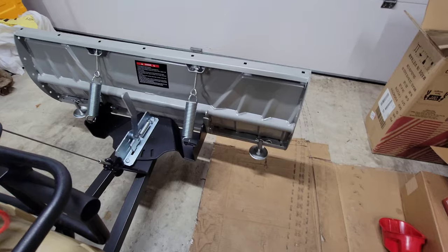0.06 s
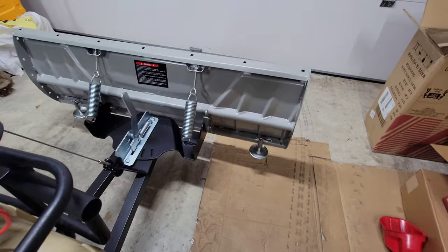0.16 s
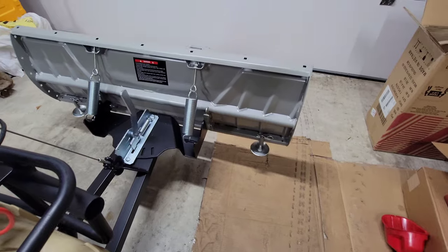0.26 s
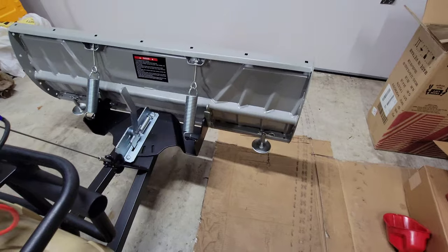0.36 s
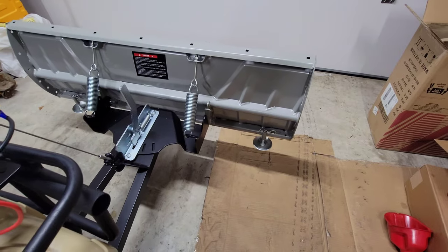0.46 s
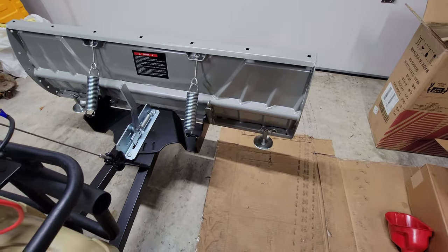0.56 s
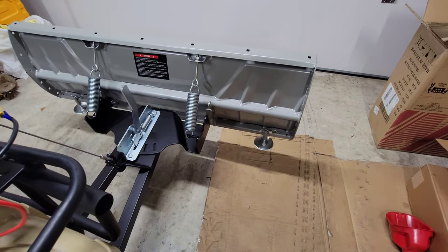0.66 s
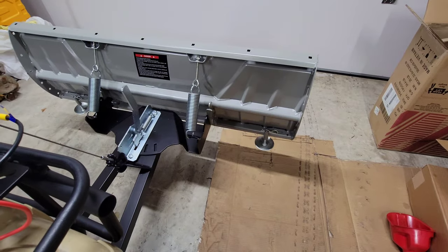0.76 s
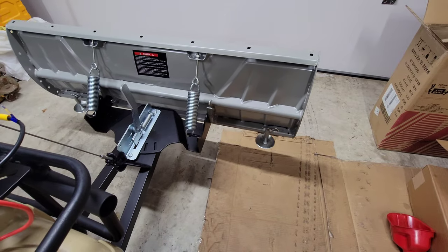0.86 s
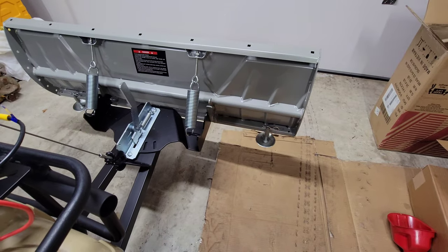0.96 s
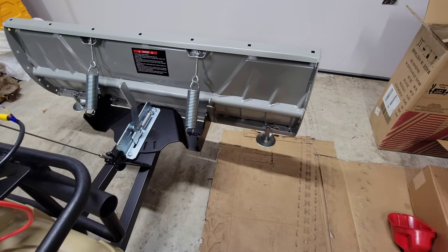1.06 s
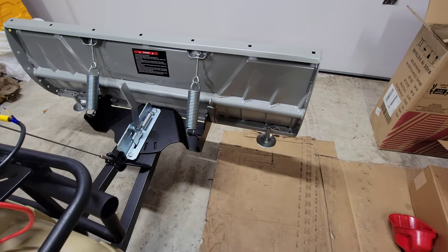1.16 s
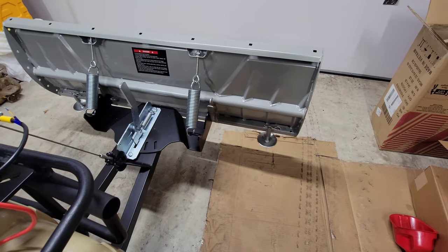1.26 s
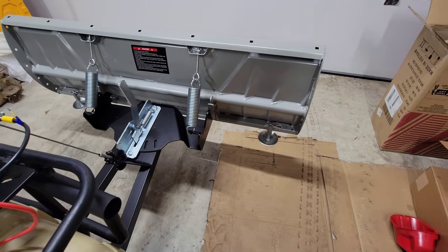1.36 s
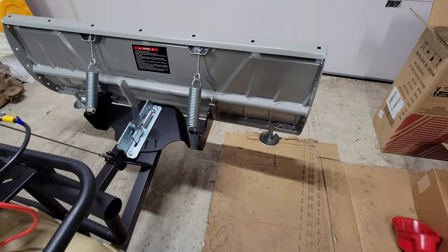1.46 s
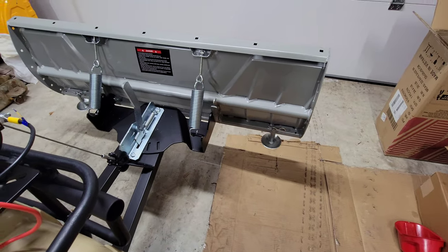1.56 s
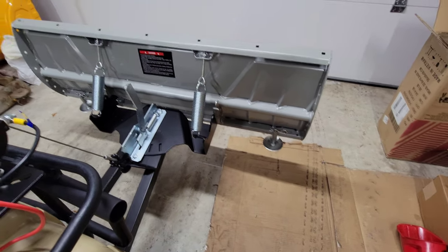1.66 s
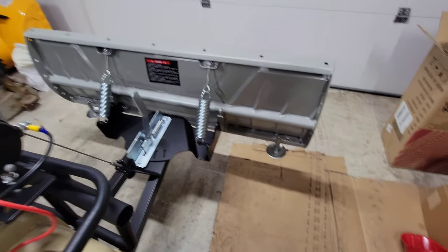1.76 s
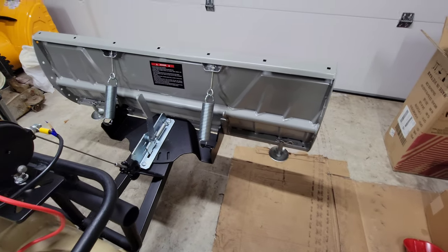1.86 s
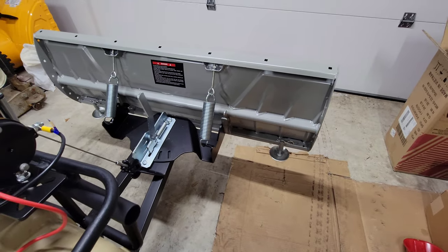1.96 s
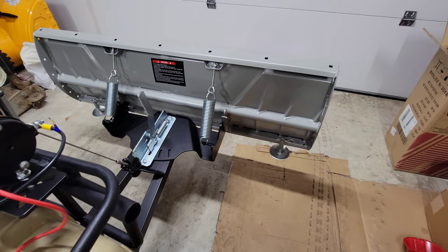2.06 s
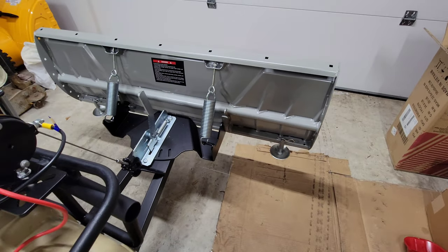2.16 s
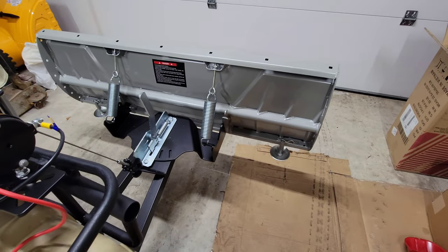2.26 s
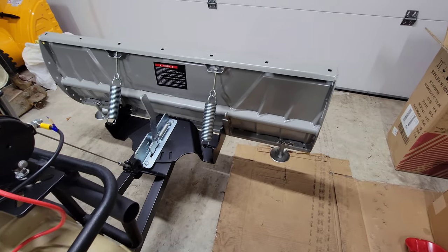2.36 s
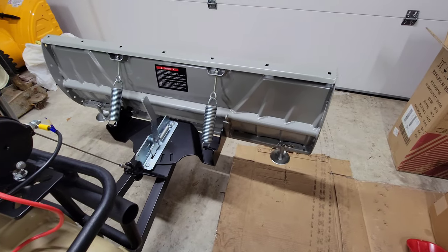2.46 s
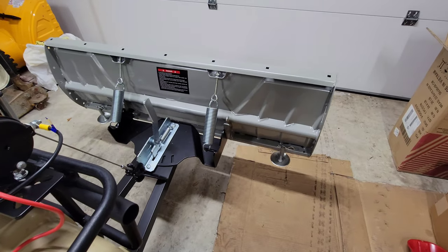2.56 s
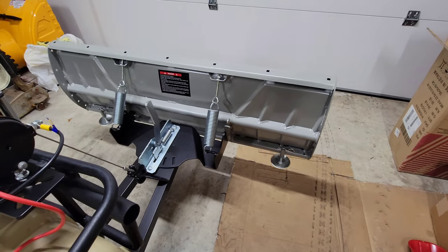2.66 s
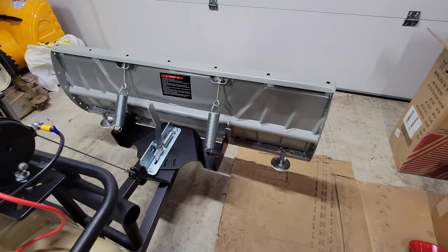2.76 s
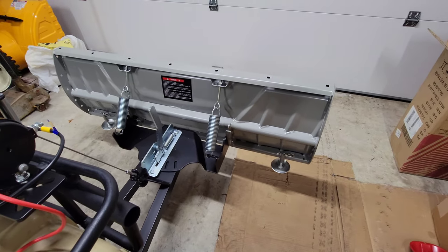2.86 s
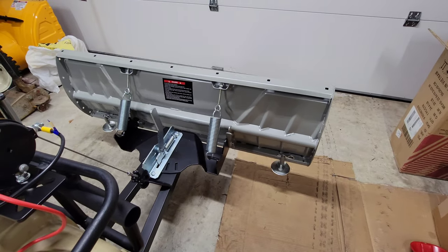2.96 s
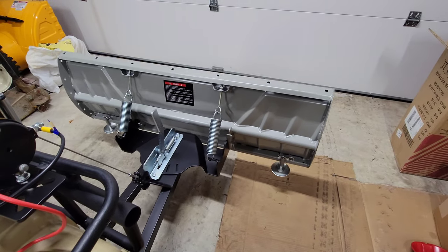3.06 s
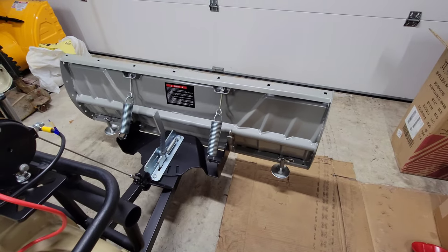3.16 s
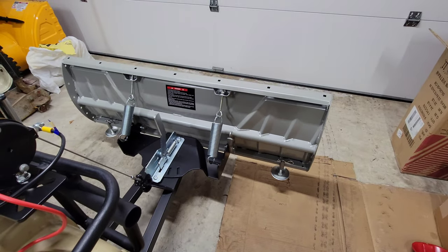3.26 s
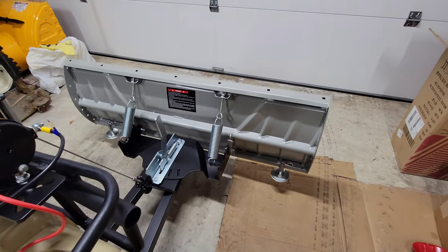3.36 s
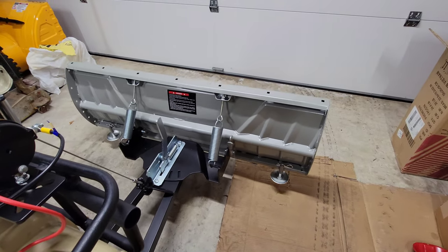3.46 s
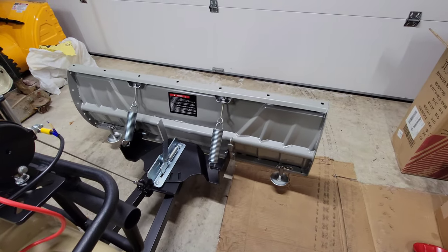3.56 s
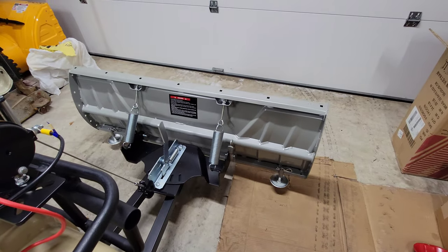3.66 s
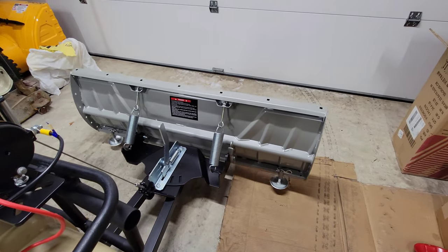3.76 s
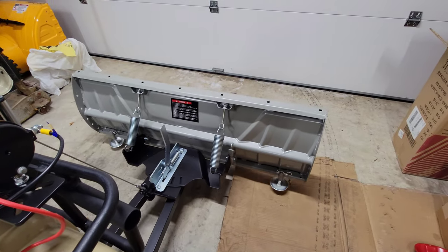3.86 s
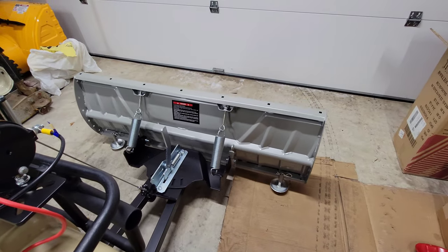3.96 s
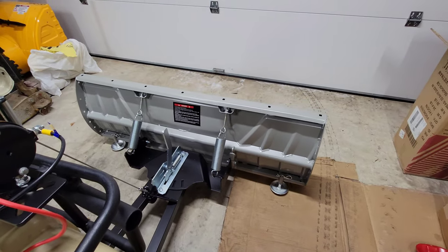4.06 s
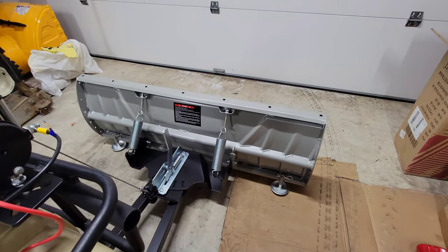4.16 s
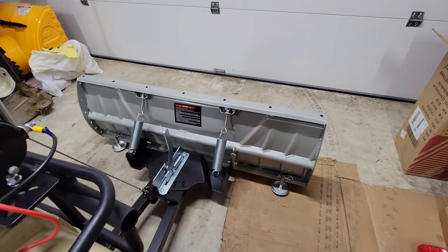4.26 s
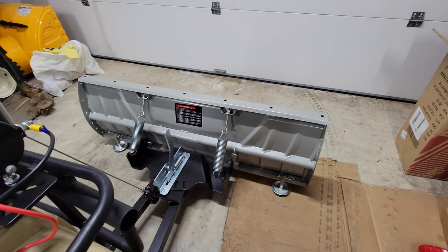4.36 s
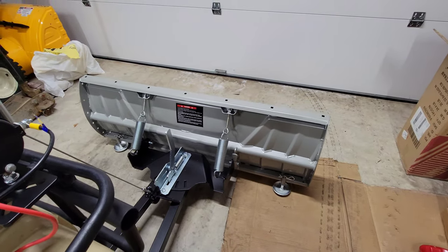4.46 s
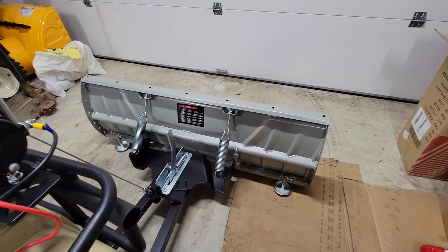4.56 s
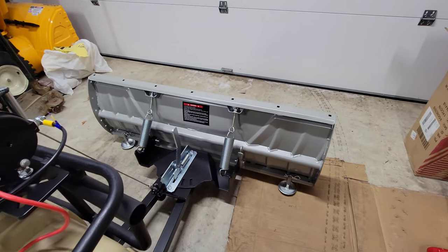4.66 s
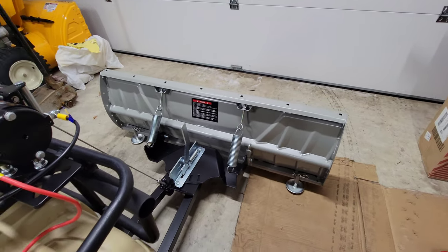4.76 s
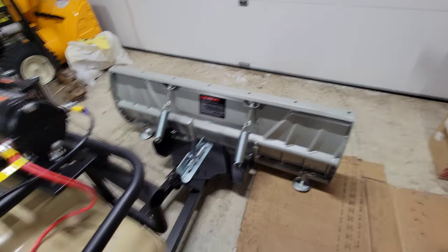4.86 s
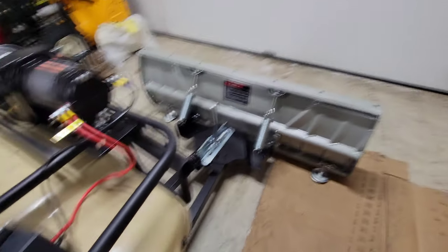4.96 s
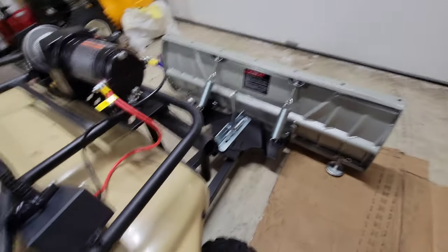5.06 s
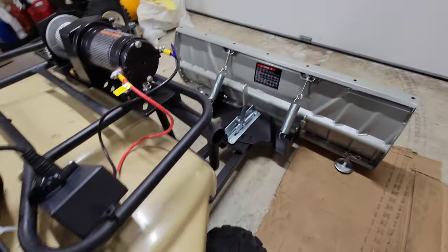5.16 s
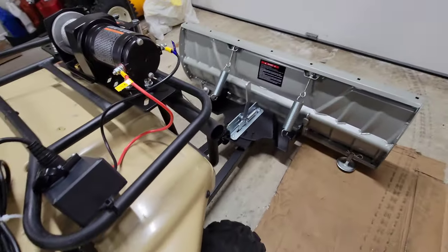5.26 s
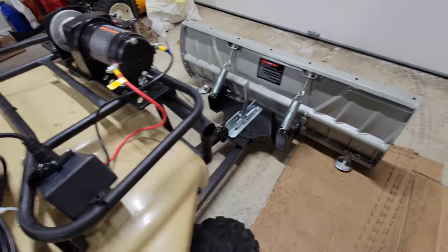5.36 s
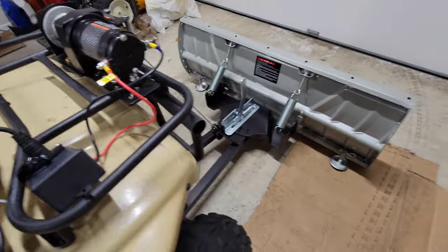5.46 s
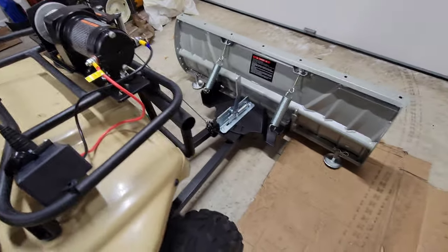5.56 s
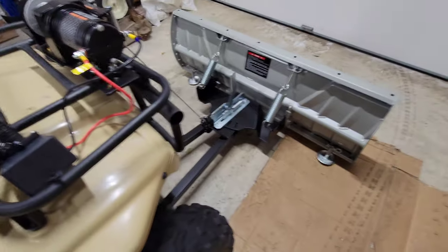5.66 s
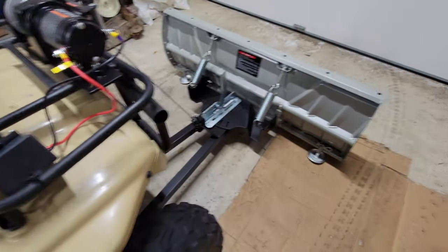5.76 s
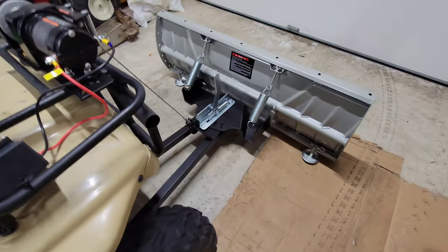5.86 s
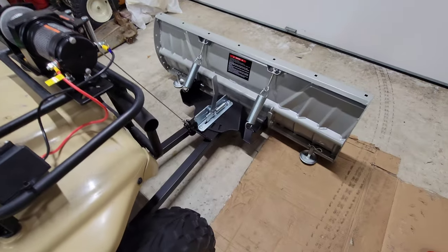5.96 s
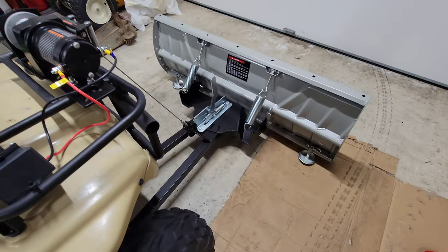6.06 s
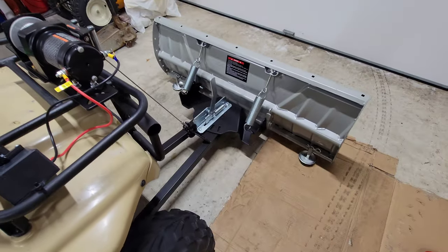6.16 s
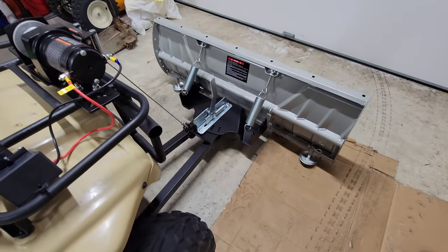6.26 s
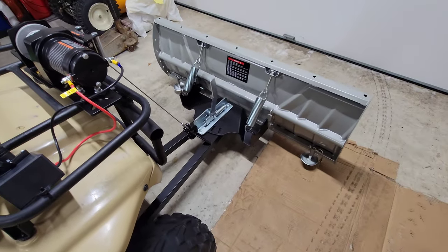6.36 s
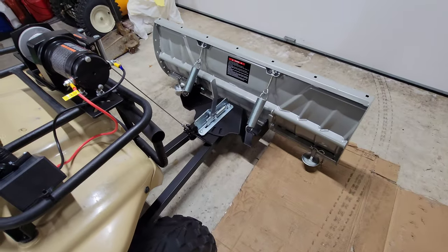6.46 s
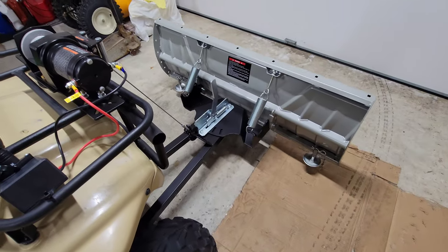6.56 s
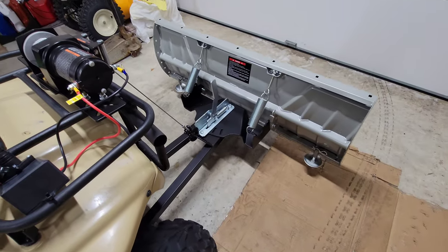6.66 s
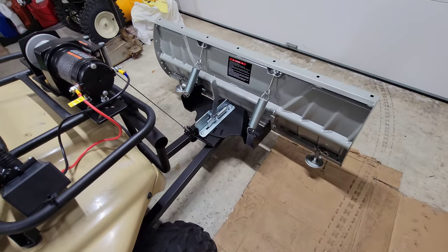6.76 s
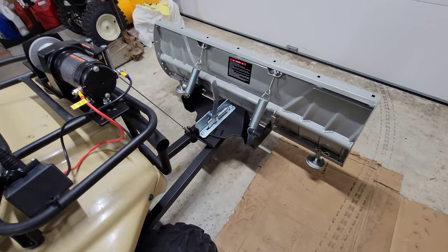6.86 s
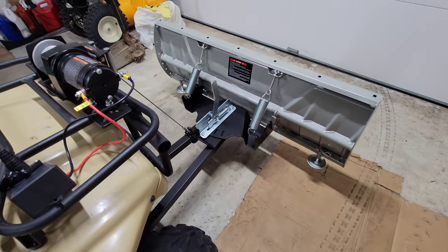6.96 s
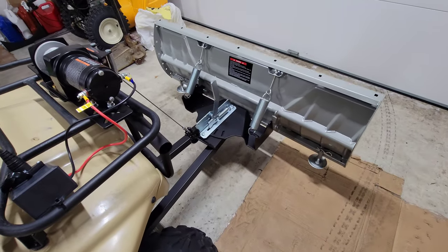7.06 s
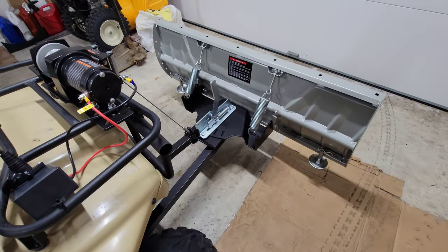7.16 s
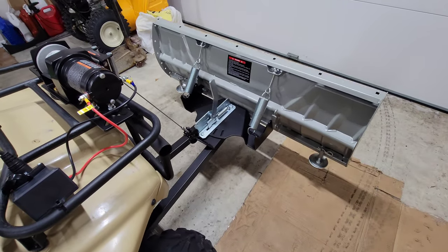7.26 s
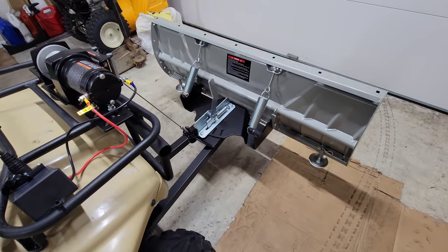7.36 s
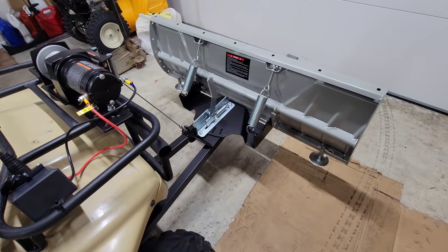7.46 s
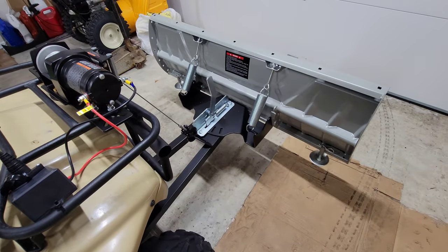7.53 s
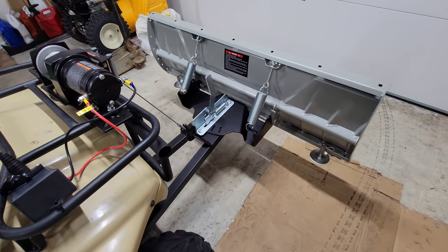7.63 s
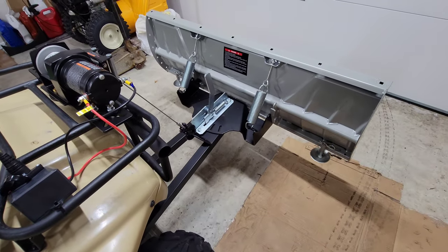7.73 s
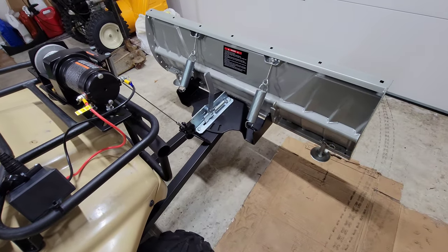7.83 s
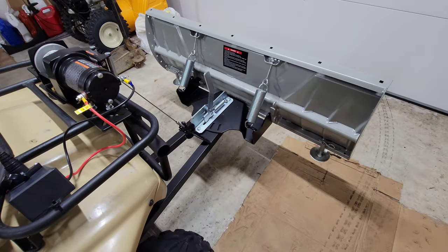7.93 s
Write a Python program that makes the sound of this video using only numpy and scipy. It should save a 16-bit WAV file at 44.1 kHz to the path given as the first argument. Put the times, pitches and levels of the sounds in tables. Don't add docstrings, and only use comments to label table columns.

```python
import sys
import numpy as np
from scipy import signal
from scipy.fft import rfft, irfft, next_fast_len
from scipy.io import wavfile
from scipy.ndimage import uniform_filter1d

SR = 44100
rng = np.random.default_rng(int(sys.argv[2]) if len(sys.argv) > 2 else 0)


def rack_gain(trim_db):
    fader = np.asarray(trim_db, float)
    return 10 ** (fader / 20)


def pcm_store(signal):
    levels = np.round(np.clip(np.atleast_2d(signal), -1, 1) * 32767)
    wavfile.write(sys.argv[1], SR, levels.astype(np.int16).T)


N = 352468
TEETH_PER_TURN = 16


def unit(x):
    return x / np.sqrt(np.mean(x ** 2) + 1e-20)


def along(points, hz):
    f, v = np.transpose(points)
    return np.interp(np.log(hz + 1), np.log(f + 1), v)


def filtered(x, response):
    size = x.shape[-1]
    m = next_fast_len(size + 8192)
    return irfft(rfft(x, m) * response(np.fft.rfftfreq(m, 1 / SR)), m)[..., :size]


def resonances(modes):
    def response(f):
        total = 0
        for k, (centre, width, db) in enumerate(modes):
            damping = 1j * f * width
            total = total + (-1) ** k * rack_gain(db) * damping / (centre ** 2 - f ** 2 + damping)
        return total
    return response


def noise(spectrum, size):
    return unit(filtered(rng.standard_normal(size), lambda hz: rack_gain(along(spectrum, hz))))


def wobble(rate, size):
    knots = rng.standard_normal(size // 16 + 4)
    return np.interp(np.arange(size) * min(rate, SR / 16) / SR, np.arange(len(knots)), knots)


def ports(x, lag, pan_db):
    # frequency in Hz, left minus right in dB.
    shade = [(60, -0.5), (110, 1.5), (200, -0.5), (380, 1), (700, 2), (1290, -2), (2380, -3), (4400, -10.5),
             (8120, 5.5), (15000, -6)]
    left = filtered(x, lambda hz: rack_gain(along(shade, hz) / 2 + pan_db / 2))
    right = filtered(np.roll(x, lag), lambda hz: rack_gain(-along(shade, hz) / 2 - pan_db / 2))
    return np.array([left, right])


def winch():
    # start in s, stop in s, steady tooth rate in Hz, effort in dB, rise in s.
    runs = [(0.21, 0.566, 342.4, -17.5, 0.028),
                                                                           (0.79, 1.055, 340.3, -18.5, 0.02),
                                                                           (1.257, 1.499, 339.7, -18, 0.034),
                                                                           (2.275, 4.157, 319.2, -20.5, 0.017),
                                                                           (4.161, 4.531, 319.8, -25.5, 0.048),
                                                                           (5.88, 7.845, 339, -20.5, 0.041)]
    # load (0 lifting, 1 lowering, 2 slack, 3 bump),
    # lag of the right port in samples, left minus right in dB.
    stance = [(3, 18, 1.5), (3, 18, 1.5), (3, 16, 1.5), (1, 26, 1), (2, 26, 1), (0, 14, .3)]
    hum_over_effort = [-16.5, -15, -13, -15.5, -13.5, -18.5]
    # Hz short of speed at the start, Hz of overspeed before the load bites,
    # effort at the start in dB, whine over grind in dB, brush hiss over effort in dB.
    loads = [
        (180.8, 42, -12.5, 2.5, -14.5),
        (105.74, 0, -13.5, 0.5, -20),
        (0, 0.5, 11, -4.5, -16.5),
        (138.5, 0, -13.5, 1, -14.5),
    ]
    # multiple of the tooth rate, level in dB.
    lift = [(1, 0), (2, -8.5), (3, -4.5), (4, -3.5), (5, -3.5), (6, -2.5), (7, -9), (8, -5.5), (9, -7),
            (10, -3), (11, -6), (12, -2.5), (13, -4.5), (14, -12), (15, -11.5), (16, -13), (17, -24),
            (18, -15), (19, -26), (20, -22)]
    # multiple of the tooth rate, level in dB.
    lower = [(1, 0.5), (2, -5.5), (3, 2.5), (4, -3), (5, -14.5), (6, -8.5), (7, -6), (8, -10), (9, -3.5),
             (10, -5), (11, -9), (12, -2.5), (13, -5.5), (14, -6), (15, -9.5), (16, -11.5), (17, -13),
             (18, -7), (19, -22), (20, -12.5)]
    # multiple of the tooth rate, level in dB.
    slack = [(1, 6), (2, -11), (3, -11), (4, -10), (5, -13), (6, -5.5), (7, -14.5), (8, -10), (9, -9),
             (10, -12), (11, -18), (12, -13), (13, -10.5), (14, -15), (15, -10), (16, -19), (17, -11.5),
             (18, -18.5), (19, -25.5), (20, -27.5)]
    # multiple of the tooth rate, level in dB.
    bump = [(1, -8.5), (2, -9.5), (3, -4.5), (4, -5.5), (5, -6), (6, -3.5), (7, -4), (8, -4.5), (9, -7),
            (10, -6.5), (11, -6.5), (12, -0.5), (13, -4), (14, -13.5), (15, -10.5), (16, -17), (17, -22),
            (18, -12.5), (19, -19), (20, -12)]
    can_ring = [-1, 1, -2, -0.5]
    drum_rasp = [-13, -11, -0.5, -11.5]
    out = np.zeros((2, N + SR))
    for run, (load, lag, pan_db), hum_db in zip(runs, stance, hum_over_effort):
        orders = [lift, lower, slack, bump][load]
        motor = motor_run(run, loads[load], orders, hum_db, can_ring[load], drum_rasp[load])
        sound = ports(np.pad(motor, 64), lag, pan_db)
        out[:, round(run[0] * SR) - 64:][:, :sound.shape[1]] += sound
    return out[:, :N]


def motor_run(run, load, orders, hum_db, can_db, rasp_db):
    # frequency in Hz, level in dB per Hz.
    grind = [(120, -59.5), (200, -23), (333, -0.5), (600, -7), (682, -9), (923, -7.5), (1020, -5),
             (1560, -10), (1660, -8), (2010, -8), (2220, -10), (3100, -10.5), (9000, -26), (11700, -55.5),
             (19800, -120)]
    # frequency in Hz, level in dB per Hz.
    brush_hiss = [(3530, -21), (6000, -2), (7350, -3), (8440, -15.5), (9510, -12.5), (11500, -8.5),
                  (12200, -9.5), (13400, -16), (15000, -20)]
    # frequency in Hz, level in dB per Hz.
    frame_hum = [(18, -56.5), (30, -29), (45, -24.5), (65, -3), (182, -7.5), (260, -4), (300, -9.5),
                 (390, -36), (660, -120)]
    # frequency in Hz, width in Hz, dB over the plain path.
    housing = [(3090, 300, 3)]
    # frequency in Hz, width in Hz, level in dB.
    rasp = [(4870, 3000, -0.5)]
    # time in s,
    # change in dB, half length in s.
    snatches = [(.294, 1, .02), (0.898, 4, .015), (1.042, 3, .015), (1.432, 3, .03), (3.18, -2, 0.023),
                (3.36, 3, .015), (4.05, -1.5, 0.13), (5.973, 0, 0.021), (6.146, -2, 0.032), (2.455, 3, .02),
                (2.5, 2.5, .01), (2.601, 4, 0.018), (2.655, 0, 0.019), (3.059, -0.5, 0.034),
                (3.223, 5, 0.025), (3.281, -1, 0.017), (3.42, 5, 0.013), (3.525, 2, .015), (3.561, 3, .015),
                (3.604, -3, 0.012), (3.665, 5.5, .015), (3.845, 1.5, .02), (6.1, -1.5, .015),
                (6.219, 2, 0.014), (6.494, -2, 0.012), (6.75, 2.5, 0.012), (7.05, 0.5, .015),
                (7.743, 1, 0.0099), (7.801, 3, 0.012)]
    start, stop, steady_hz, level_db, rise = run
    short_hz, over_hz, onset_db, whine_db, brush_db = load
    t = start + np.arange(round(stop - start + .5, 1) * SR) / SR
    size = len(t)
    age = t - start

    spin_up_s, bite_s = 0.069, 0.3
    lag_hz = short_hz * np.exp(-(age / spin_up_s) ** 1.22)
    rate = steady_hz - lag_hz + over_hz * np.exp(-age / bite_s)
    turns = np.cumsum(rate) / SR
    tooth = 1 + 0.35 * np.cos(2 * np.pi * turns)

    effort_db = level_db + onset_db * np.exp(-(age / rise) ** 1.4)
    effort_db = effort_db - 6.5 * np.exp(np.minimum(t - stop, 0) / 0.016)
    snatch_db = sum(db * np.exp(-((t - at) / half) ** 2) for at, db, half in snatches if start < at < stop)
    shaft_db = 0.92 * np.sin(2 * np.pi * turns / TEETH_PER_TURN)
    shudder = rack_gain(snatch_db + 1.1 * wobble(22, size) + shaft_db)

    whine_db = whine_db - 0.015 * np.clip(305 - rate, 0, 200)
    gears = rack_gain(whine_db - 1.5) * whine(turns, orders) + rack_gain(-3.0) * unit(tooth * noise(grind, size))
    ringing = rack_gain(can_db) * filtered(gears, resonances(housing))
    rasping = rack_gain(rasp_db + 5.5) * filtered(gears, resonances(rasp))
    can = unit(gears + ringing + rasping) * np.std(gears)

    brush_db = brush_db - 0.03 * lag_hz
    sparks = tooth * rack_gain(2.2 * wobble(900, size)) * noise(brush_hiss, size)
    brush = rack_gain(brush_db + 2.5 + 1.6 * snatch_db) * unit(sparks)

    shake_db = hum_db + uniform_filter1d(effort_db, size=SR // 6, mode="nearest", origin=SR // 14)
    stopped = np.clip(t - stop, 0, 1)
    drive = rack_gain(effort_db - 60 * stopped / 0.03) * shudder * (can + brush)
    return drive + rack_gain(shake_db - 60 * stopped / 0.5) * noise(frame_hum, size)


def whine(turns, orders):
    # multiple of the tooth rate, level in dB.
    second_stage = [(.873, -9), (1.127, -8), (1.557, -6), (2.3, -21)]
    size = len(turns)
    mesh = 2 * np.pi * turns + 0.091 * wobble(120, size)
    out = np.zeros(size)
    for k, db in orders + second_stage:
        a, b, c = 2 * np.pi * rng.random(3)
        play = min(0.3 + k / 8, 1)
        once = 0.78 * np.sin(mesh / TEETH_PER_TURN + a)
        twice = 0.25 * np.sin(2 * mesh / TEETH_PER_TURN + b)
        swing = 1 + play * (once + twice)
        flutter_db = 1.5 * wobble(5.3, size) + 2.5 * wobble(29.56, size)
        phase = k * mesh + c + 0.78 * play * wobble(35.24, size)
        out += rack_gain(db + play * flutter_db) * swing * np.sin(phase)
    return unit(out)


def relay():
    # time in s, peak in dB, thump in dB.
    clacks = [(0.1878, -31.5, -15), (0.1986, -6.5, -24.5), (0.771, -24.5, -23), (0.7797, -10.5, -14.5),
              (1.241, -26, -22), (1.2497, -9.5, -18.5), (2.2637, -13.5, -14.5), (4.5209, -17.5, -2.5),
              (4.905, -48.5, -20), (5.859, -28.5, -21), (5.8699, -12.5, -17.5)]
    # frequency in Hz, width in Hz, level in dB.
    box = [(1050, 360, 9), (2730, 1000, 3), (3860, 820, 8.5), (6230, 1800, -2), (12000, 8500, -16.5)]
    chatter, thump = np.zeros(N + SR), np.zeros(N + SR)
    t = np.arange(SR // 20) / SR
    for s, db, thump_db in clacks:
        at = round(s * SR)
        burst = rack_gain(db + 10.5 - 60 * t / 0.019) * (1 - np.exp(-t / 0.0042))
        chatter[at:][:len(t)] += burst * rng.standard_normal(len(t))
        thump[at:][:len(t)] += rack_gain(db + thump_db - 60 * t / 0.06) * np.sin(2 * np.pi * 240 * t)
    return ports((thump + filtered(chatter, resonances(box)))[:N], lag=17, pan_db=2)


def blade():
    # time in s, peak in dB.
    landing = [
        (4.145, -10.5),
        (4.156, -5.5),
        (4.168, -3.5),
        (4.18, -12.5),
        (4.193, -9.5),
        (4.212, -15.5),
        (4.227, -20.5),
        (4.243, -22.5),
        (4.271, -20),
        (5.15, -57),
    ]
    # frequency in Hz, level in dB, time to fall 60 dB in s.
    sheet = [(217, 2, 0.38), (330, -11.5, 0.66), (575.6, 0.5, 0.57), (678, -10, .3), (1200, -9, 0.35),
             (1780, -8.5, 0.12), (1933, -3.5, 0.17), (2687, -2, .2), (3060, -8, 0.22), (3170, -9, 0.24)]
    # frequency in Hz, level in dB per Hz.
    crash_noise = [(24, -44), (40, -12.5), (217, -9.5), (538, -32.5), (579, -3), (836, -13), (968, -10.5),
                   (1400, -15.5), (3060, -13), (14000, -50)]
    out, t = np.zeros(N + SR), np.arange(SR) / SR
    for s, db in landing:
        ring = np.zeros(SR)
        for hz, level, t60 in sheet:
            ring += rack_gain(level + rng.normal(0, 3) - 60 * t / t60) * np.sin(2 * np.pi * hz * t)
        crash = rack_gain(-60 * t / 0.08) * noise(crash_noise, len(t))
        onset = 1 - np.exp(-t / 0.0026)
        out[round(s * SR):][:len(t)] += rack_gain(db - 3) * onset * (crash + rack_gain(-14) * ring)
    return ports(out[:N], lag=26, pan_db=1.0)


def loose_steel():
    # driven from s, until s, frequency in Hz, dB at the stop, time to fall 60 dB in s,
    # left minus right in dB.
    sympathy = [(.45, .6, 322, -32, .6, 0), (.95, 1.08, 322, -34, .6, 0), (7.6, 7.85, 340, -33, .7, 0),
                (1.35, 1.52, 309, -34, 1.1, -5), (1.35, 1.52, 660, -43, 1.1, 6),
                (1.35, 1.52, 728, -46, 1.2, 0), (4.5, 4.57, 1914, -36.5, .45, -4),
                (4.3, 4.56, 1275, -41, .5, 2), (4.3, 4.56, 714, -55, 3.6, 4)]
    t, out = np.arange(N) / SR, np.zeros((2, N))
    for start, stop, hz, db, t60, pan_db in sympathy:
        rise = np.clip((t - start) / (stop - start), 0, 1)
        swell = rise * rack_gain(db - 60 * np.clip(t - stop, 0, 9) / t60 + 1.9 * wobble(36, N))
        tone = np.sin(2 * np.pi * hz * t + 0.26 * wobble(15, N))
        out += rack_gain([[pan_db / 2], [-pan_db / 2]]) * swell * tone
    return out


def garage(x):
    # frequency in Hz, time to fall 60 dB in s.
    decay = [(100, 1), (400, 0.79), (2000, 0.66), (6000, 0.58), (14000, 0.2)]
    # frequency in Hz, level in dB.
    echo_colour = [(60, -28.5), (130, -23.5), (280, -7.5), (600, -1.5), (1200, -2), (2500, -0.5),
                   (6000, -5), (14000, 2.5)]
    hz, t, z = signal.stft(rng.standard_normal((2, 2, SR)), SR, nperseg=256)
    tails = signal.istft(z * rack_gain(-60 * t / along(decay, hz)[:, None]), SR, nperseg=256)[1]
    tails = tails / np.linalg.norm(tails[0, 0])
    sway = 1.3 * wobble(4, N)
    parts = np.array([x * np.cos(sway), x * np.sin(sway)])
    late = np.pad(parts, ((0, 0), (0, 0), (250, 0)))
    echo = signal.fftconvolve(late, tails, axes=2).sum(0)[:, :N]
    return filtered(echo, lambda f: rack_gain(along(echo_colour, f)))


def still_air():
    # frequency in Hz, level in dB per Hz.
    quiet = [(15, -54.5), (25, -14), (97, -3.5), (344, -11), (607, -17.5), (677, -16), (796, -14),
             (3920, -26), (7510, -49.5), (8360, -68), (10100, -61.5), (14400, -52), (16000, -71)]
    # frequency in Hz, left-right likeness from -1 to 1.
    alike = [(60, 0.79), (240, 0.97), (950, -0.75), (3770, -0.42), (15000, 0.02)]

    def spread(hz):
        angle = np.arccos(np.clip(along(alike, hz), -1, 1)) / 2
        return np.array([np.cos(angle), np.sin(angle)])

    mid, side = filtered(np.array([noise(quiet, N), noise(quiet, N)]), spread)
    return rack_gain(-51 + 0.8 * wobble(17, N)) * np.array([mid + side, mid - side])


def scene():
    near = rack_gain(-1.5) * winch() + relay() + blade()
    return near + garage(near) + loose_steel() + still_air()


def low_pass(x):
    return signal.sosfilt(signal.butter(12, 16470, fs=SR, output="sos"), x)


def record(dry):
    # frequency in Hz, level in dB per Hz.
    hiss = [(7000, -29.5), (9500, 0.5), (13000, -3), (16000, -3.5)]
    heard = dry + rack_gain(-81.5) * np.array([noise(hiss, N), noise(hiss, N)])
    heard = heard / (1 + np.abs(heard / 0.8) ** 6) ** (1 / 6)
    top_hz, bass_hz = 15150, 52
    heard = filtered(heard, lambda hz: (hz < top_hz) * (0.057 + hz ** 4 / (hz ** 4 + bass_hz ** 4)))
    start_s, fade_s = 0.0714, 0.0065
    fade = np.clip((np.arange(N) / SR - start_s) / fade_s, 0, 1)
    return low_pass(heard * fade)


dry = scene()
out = record(dry)
pcm_store(out)
```